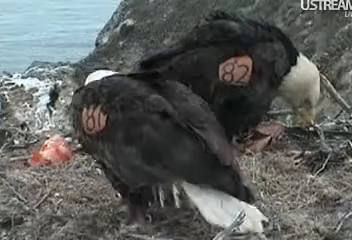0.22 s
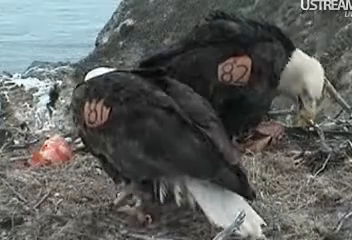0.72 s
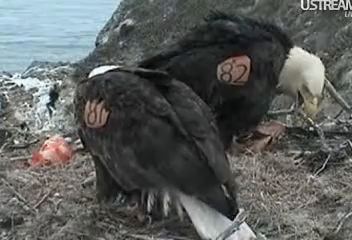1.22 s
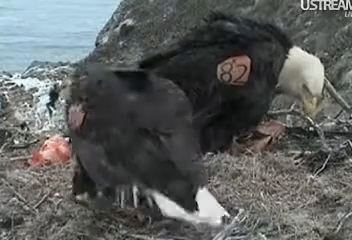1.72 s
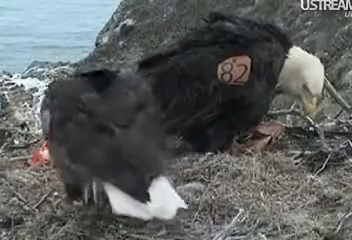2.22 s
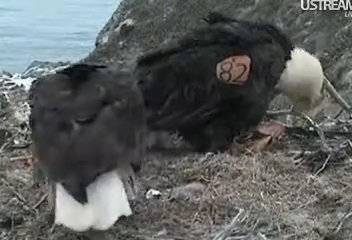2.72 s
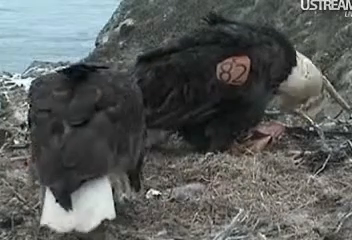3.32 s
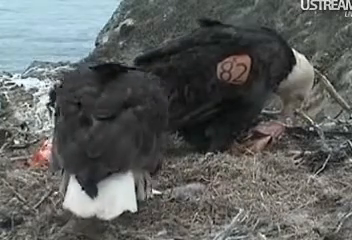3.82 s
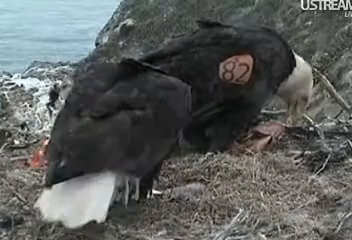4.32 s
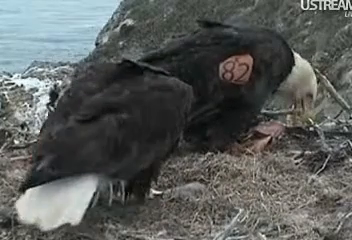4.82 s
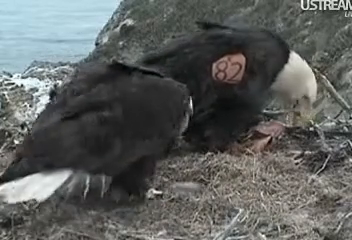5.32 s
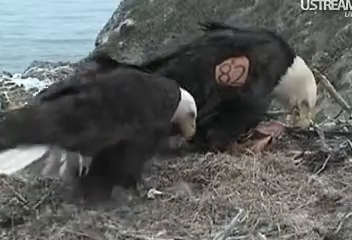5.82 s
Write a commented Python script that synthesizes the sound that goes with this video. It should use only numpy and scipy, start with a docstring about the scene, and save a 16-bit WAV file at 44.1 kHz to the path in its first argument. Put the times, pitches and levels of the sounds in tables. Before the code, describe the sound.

A bald eagle gives a faint whistle, then a long loud piercing one ending in a falling yelp, and later a chirp, over steady surf hiss.

```python
"""A bald eagle on a sea-cliff nest gives a soft whistle, a long loud one ending in a falling yelp, and a chirp.
Each call is one gliding tone of three partials, answered faintly by the rock behind the nest.
A second eagle treads softly: dull noise thuds in the lining and a low rumble of the sticks.
Surf below is two bands of shaped noise, a roar and a hiss, with a faint far tone in it.
Steady sines hum with the mains on the microphone line."""
import sys
import numpy as np
from scipy import signal
from scipy.fft import rfft, irfft, next_fast_len
from scipy.io import wavfile
from scipy.ndimage import uniform_filter1d, map_coordinates

SR = 44100
rng = np.random.default_rng(int(sys.argv[2]) if len(sys.argv) > 2 else 0)


def unload_wav(signal):
    """Save mono or channel-first audio to the path in sys.argv[1] as 16-bit WAV at rate SR, clipped to [-1, 1]."""
    wavfile.write(
        sys.argv[1],
        SR,
        np.round(np.clip(np.atleast_2d(signal).T, -1, 1) * 32767).astype(np.int16),
    )


N = 267687


def amp(db):
    """Decibels to gain."""
    return 10 ** (np.asarray(db) / 20)


def unit(x):
    """Scale to rms 1."""
    return x / np.sqrt(np.mean(x ** 2) + 1e-20)


def curves(rows):
    """Draw one value per sample for each column after the time."""
    times, *columns = np.transpose(rows)
    return [np.interp(np.arange(N) / SR, times, column) for column in columns]


def wobble(rate):
    """A smooth random curve through `rate` knots a second."""
    knots = rng.standard_normal(int(N * rate / SR) + 4)
    return map_coordinates(knots, [np.arange(N) * rate / SR])


def swell(top_s, rise_s, fall_s, steep=2):
    """A bell-shaped gain that tops out at top_s; a higher steep squares its shoulders."""
    t = np.arange(N) / SR - top_s
    return np.exp(-np.abs(t / np.where(t < 0, rise_s, fall_s)) ** steep)


def filtered(x, response):
    """Shape x with a gain given as a function of frequency."""
    size = next_fast_len(len(x) + SR // 2)
    gain = response(np.fft.rfftfreq(size, 1 / SR))
    return irfft(rfft(x, size) * gain, size)[:len(x)]


def rush(spectrum, patchy_db):
    """Coloured noise of rms 1 whose bands drift louder and softer in random patches."""
    grid = signal.stft(rng.standard_normal(N), nperseg=512)[2]
    patches = uniform_filter1d(rng.standard_normal(grid.shape), size=5, axis=0)  # blur across frequency
    patches = uniform_filter1d(patches, size=16, axis=1)  # blur across time
    noise = signal.istft(grid * amp(patchy_db * unit(patches)), nperseg=512)[1][:N]
    f, db = np.transpose(spectrum)

    def colour(hz):
        return amp(np.interp(np.log(hz + 1), np.log(f), db, right=-120))
    return unit(filtered(noise, colour))


def eagle():
    """The three calls of the syrinx: soft whistle, loud whistle and chirp."""
    return soft_whistle() + loud_whistle() + chirp()


# the timbre at full voice, where the octave is the strongest partial
FULL_HZ, FULL_DB = 1227.4, -22
FUNDAMENTAL_DB = -4.5  # against the octave, at full voice
FUNDAMENTAL_GROWS, THIRD_GROWS = 0.54, 1.25  # dB for each dB of the octave
THROAT_DB_PER_HZ = 0.115  # the lower the pitch, the more the octave stands out


def voice(pitch, gain, third_db, jitter, shimmer_db):
    """A clean tone of three partials; the octave takes over as the bird pushes harder or drops in pitch."""
    phase = 2 * np.pi * np.cumsum(pitch * (1 + jitter * wobble(140))) / SR
    effort = gain / amp(FULL_DB)
    throat = amp(THROAT_DB_PER_HZ * (pitch - FULL_HZ))
    fundamental = amp(FUNDAMENTAL_DB) * effort ** FUNDAMENTAL_GROWS * np.sin(phase)
    octave = effort * np.sin(2 * phase)
    third = amp(third_db) * effort ** THIRD_GROWS * np.sin(3 * phase)
    tone = octave + throat * (fundamental + third)
    return np.sqrt(2) * amp(FULL_DB + shimmer_db * wobble(40)) * tone


SAG_HZ, SAG_S = 91, 0.024  # by the top of a yelp the pitch has sagged this far, over this time


def sag(top_s):
    """Hz by which the pitch drops, ever faster, through a yelp with its top at top_s."""
    return SAG_HZ * np.clip(1 + (np.arange(N) / SR - top_s) / SAG_S, 0, 2) ** 2


# the held note of the loud whistle, before its gain and sag: start_s, pitch_hz, octave_level_db
LOUD_NOTE = [(1.76, 1208, -49), (1.784, 1216, -34.5), (1.806, 1204, -27.5), (1.848, 1165, -27),
             (1.89, 1147, -33.5), (1.906, 1151, -35.5), (1.998, 1190, -23.5), (2.062, 1182, -23),
             (2.24, 1198, -23), (2.458, 1225, -21.5), (2.602, 1213, -22.5), (2.666, 1227, -24),
             (2.68, 1227, -24)]
# short pushes of air, first the yelp ending the loud whistle, then the chirp: top_s, level_db, rise_s, fall_s
YELP_PUSHES = [(2.706, -20, 0.017, 0.0078), (6.0375, -22, 0.0076, 0.0066)]
ONSET_S, HELD_DB = 0.015, 0.3  # attack and extra gain of the held note


def loud_whistle():
    """A long held note; a last push of air bends it down and breaks it off."""
    pitch, level_db = curves(LOUD_NOTE)
    top_s, push_db, rise_s, fall_s = YELP_PUSHES[0]
    held = amp(level_db + HELD_DB) * swell(LOUD_NOTE[0][0], ONSET_S, np.inf)
    push = amp(push_db) * swell(top_s, rise_s, np.inf)
    cutoff = swell(top_s, np.inf, fall_s, steep=2.8)
    return voice(pitch - sag(top_s), (held + push) * cutoff, third_db=-22.5, jitter=0.0011, shimmer_db=0.15)


CHIRP_HZ = 1215  # pitch from which the lone chirp falls


def chirp():
    """One short push of air: a falling yelp with no whistle before it."""
    top_s, level_db, rise_s, fall_s = YELP_PUSHES[1]
    gain = amp(level_db) * swell(top_s, rise_s, fall_s, steep=2.5)
    return voice(CHIRP_HZ - sag(top_s), gain, third_db=-16, jitter=0.002, shimmer_db=0.0)


# the soft whistle as one swell: top_s, pitch_hz at the top, octave_level_db, rise_s, fall_s
SOFT_SWELL = (0.565, 1216, -36.2, 0.14, 0.235)
# the air behind it: start_s, end_s, fade_s
SOFT_AIR = (0.24, 0.92, 0.06)
SOFT_GLIDE_HZ_PER_S = 30


def soft_whistle():
    """A quiet note swells and fades on a short span of air while its pitch creeps up."""
    t = np.arange(N) / SR
    top_s, hz, db, rise_s, fall_s = SOFT_SWELL
    start_s, end_s, fade_s = SOFT_AIR
    air = np.clip(np.minimum(t - start_s, end_s - t) / fade_s, 0, 1)
    pitch = hz + SOFT_GLIDE_HZ_PER_S * np.clip(t - top_s, -2 * rise_s, rise_s)
    gain = amp(db) * air * swell(top_s, rise_s, fall_s)
    return voice(pitch, gain, third_db=-16, jitter=0.002, shimmer_db=0.8)


def rock_echo(x, t60, wet_db):
    """The rock behind the nest scatters a faint answer: noise decaying 60 dB in t60 seconds."""
    t = np.arange(SR // 4) / SR
    tail = rng.standard_normal(len(t)) * amp(-60 * t / t60) * (t > .006)
    return amp(wet_db) * signal.fftconvolve(x, tail / np.linalg.norm(tail))[:N]


# footfalls in the nest: start_s, level_db before the overall trim, thud_hz at the centre of the noise band
FOOTFALLS = [(3.005, -34, 210), (3.305, -37, 195), (3.945, -35, 165), (4.045, -38, 105), (4.115, -31, 235),
             (4.292, -31, 250), (5.599, -39, 97)]


def steps(level_db, rise, width):
    """Each footfall is a soft, dull thud of band-shaped noise in the grass lining."""
    out, t = np.zeros(N + SR), np.arange(SR // 4) / SR
    envelope = t / rise * np.exp(1 - t / rise)
    for start_s, db, thud_hz in FOOTFALLS:
        noise = rng.standard_normal(len(t))
        thud = filtered(noise, lambda hz: np.exp(-(np.log((hz + 1) / thud_hz) / width) ** 2))
        out[round(start_s * SR):][:len(t)] += amp(db + level_db) * unit(thud) * envelope
    return out[:N]


# the treading bird shifts its weight on the sticks: top_s, rumble_db, rise_s, fall_s
WEIGHT_SHIFTS = [(4.09, -44, 0.1, 0.085), (5.56, -47, 0.043, 0.1)]


def shuffle():
    """The nest rumbles in low noise under the shifting weight."""
    weight = sum(amp(db) * swell(top_s, rise_s, fall_s) for top_s, db, rise_s, fall_s in WEIGHT_SHIFTS)
    rumble = [(25, -7.5), (70, 6.0), (110, -9), (200, -13), (500, -28)]  # frequency_hz, relative_db
    return weight * rush(rumble, patchy_db=2.0)


# colour of the low roar: frequency_hz, relative_db
ROAR_COLOUR = [(20, -1), (40, -7), (85, -7.5), (140, -9.5), (215, -7.5), (290, 0.5), (345, -1.5),
               (420, -3.5), (590, -1), (800, -4), (1000, -5.5), (1400, -8.5), (1950, -34), (3300, -120)]
# colour of the foam's hiss: frequency_hz, relative_db
FOAM_COLOUR = [(900, -40), (1300, -10.5), (1600, -4.5), (1850, -1), (2080, 0.5), (2300, -4.5), (2550, -7),
               (3000, -11.5), (3800, -17), (5000, -22.5), (6500, -25.5), (8000, -30), (8650, -30),
               (10300, -58.5)]
# one larger wave lifts the roar: top_s, lift_db, rise_s, fall_s
LARGE_WAVE = (5.0, 0.91, 0.83, 1.1)
ROAR_DB, HISS_DB = -38.3, -39.5  # roar without the large wave, hiss at mid scene
HISS_DB_PER_S = 0.17  # the foam builds slowly


def surf():
    """Distant breakers: a low roar and the brighter hiss of foam, each heaving a little."""
    t = (np.arange(N) - N / 2) / SR  # seconds from mid scene
    top_s, lift_db, rise_s, fall_s = LARGE_WAVE
    roar_db = ROAR_DB + lift_db * swell(top_s, rise_s, fall_s) + 0.3 * wobble(1.8)
    hiss_db = HISS_DB + HISS_DB_PER_S * t + 0.2 * wobble(2)
    roar = amp(roar_db) * rush(ROAR_COLOUR, patchy_db=0.67)
    hiss = amp(hiss_db) * rush(FOAM_COLOUR, patchy_db=0.57)
    return roar + hiss


# a faint tone in the surf, around which pitch and level waver: top_s, pitch_hz, level_db, rise_s, fall_s
DISTANT_TONE = (3, 592.5, -47, 0.24, 0.6)


def far_tone():
    """A faint sine, unsteady in pitch and level, comes and goes in the surf."""
    top_s, hz, db, rise_s, fall_s = DISTANT_TONE
    phase = 2 * np.pi * np.cumsum(hz * (1 + 0.014 * wobble(40))) / SR
    return np.sqrt(2) * amp(db + 2.8 * wobble(18)) * swell(top_s, rise_s, fall_s) * np.sin(phase)


# mains lines: pitch_hz, rms_level_db
MAINS_LINES = [(59.7, -47.5), (119.6, -66), (179.2, -58), (356.3, -52.5)]


def hum():
    """Steady sines of mains hum on the microphone line, each from a random phase."""
    t = np.arange(N) / SR
    return sum(np.sqrt(2) * amp(db) * np.sin(2 * np.pi * (hz * t + rng.random())) for hz, db in MAINS_LINES)


def scene():
    """Calls, rock echo, footfalls, rumble, surf, far tone and hum at one microphone."""
    calls = eagle()
    echo = rock_echo(calls, t60=.12, wet_db=-30.5)
    nest = calls + echo + steps(level_db=-7, rise=0.022, width=0.6) + shuffle()
    return (nest + surf() + far_tone() + hum())[None]


# the narrow treble dip: low_edge_hz, high_edge_hz
DIP_EDGES = (5390, 5660)
TOP_HZ = 10300  # band limit


def record(dry):
    """The channel has a narrow dip in the treble and nothing above its band limit."""
    low_hz, high_hz = DIP_EDGES

    def channel(hz):
        dip = amp(-19 * ((hz > low_hz) & (hz < high_hz)))
        return dip * (hz < TOP_HZ)
    return filtered(dry[0], channel)[None]


dry = scene()
out = record(dry)
unload_wav(out)
```